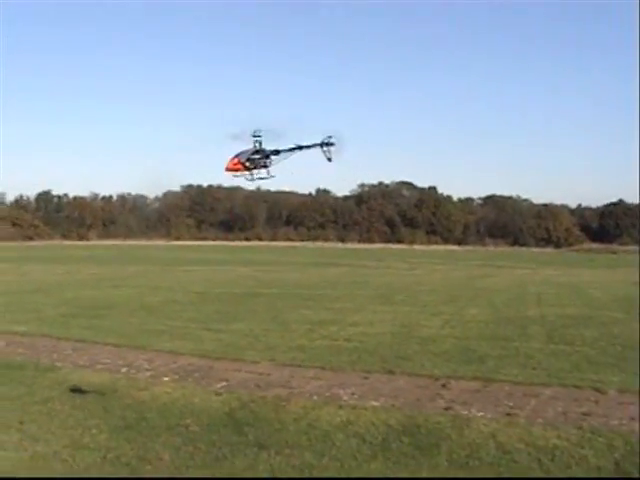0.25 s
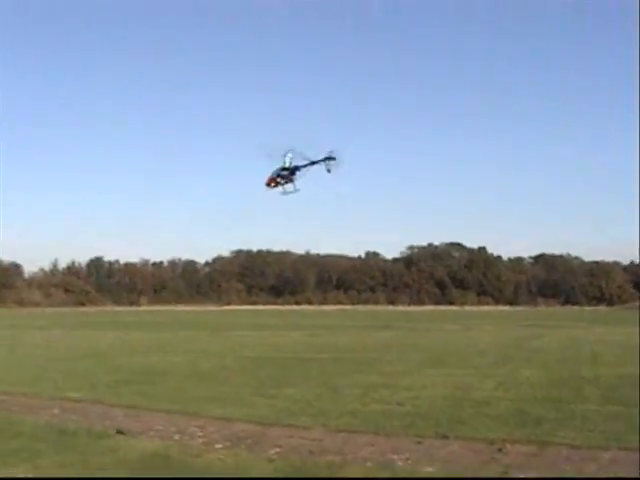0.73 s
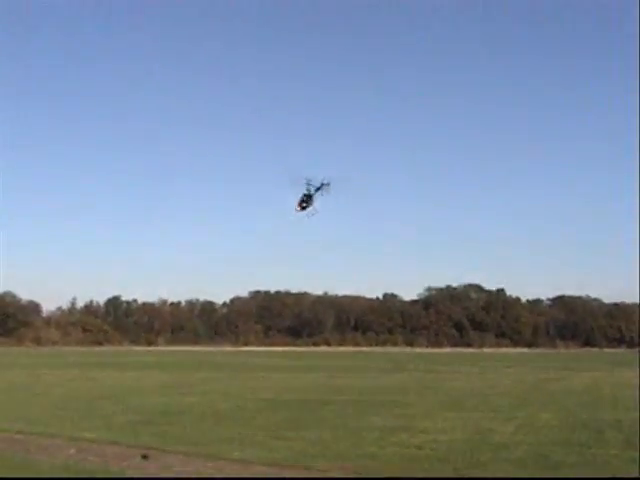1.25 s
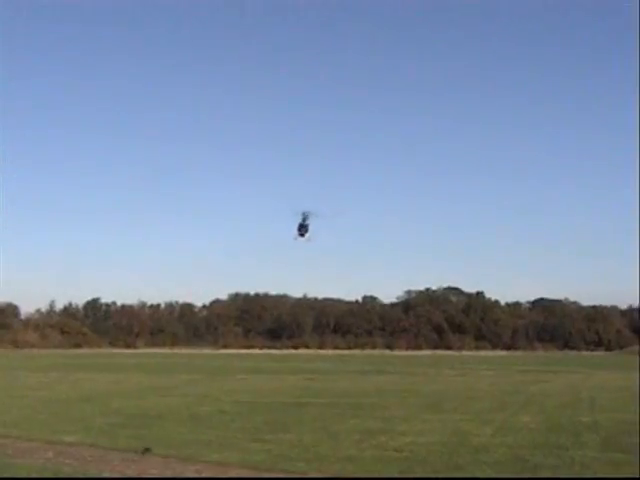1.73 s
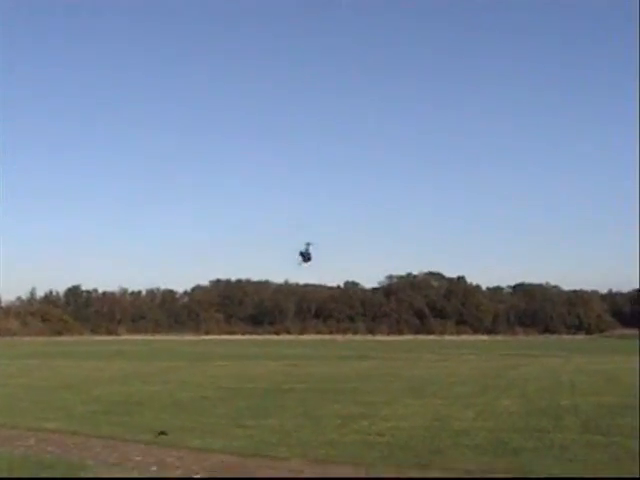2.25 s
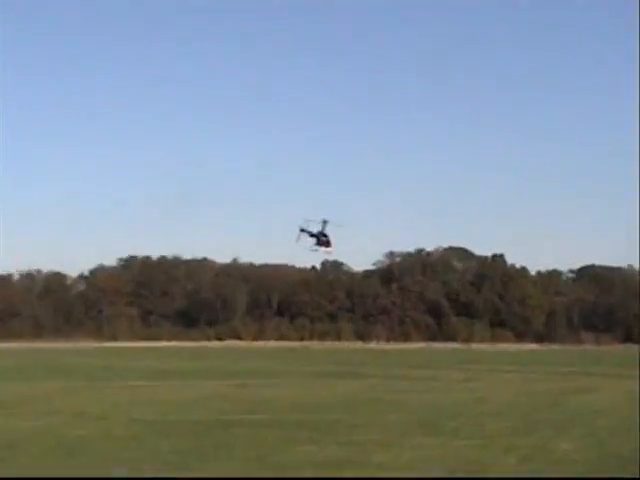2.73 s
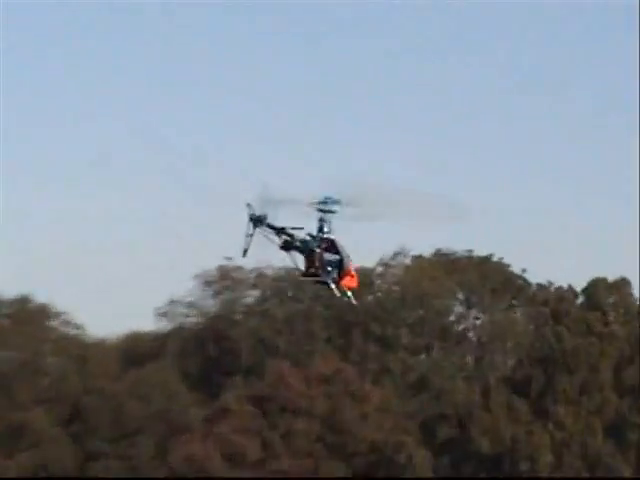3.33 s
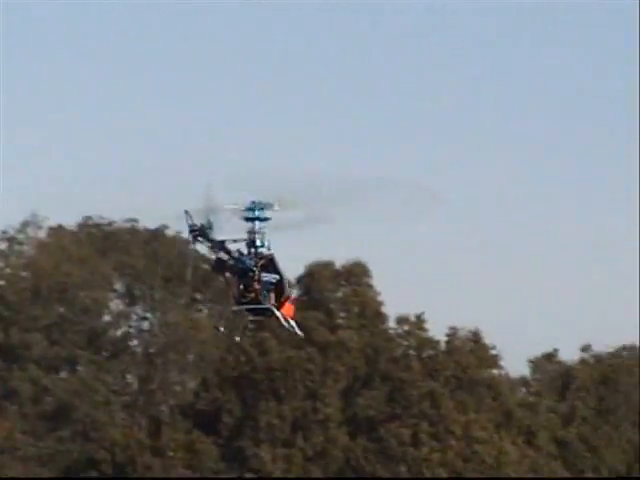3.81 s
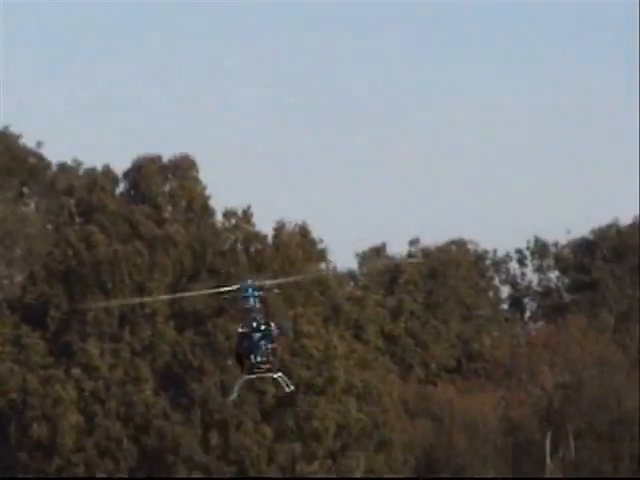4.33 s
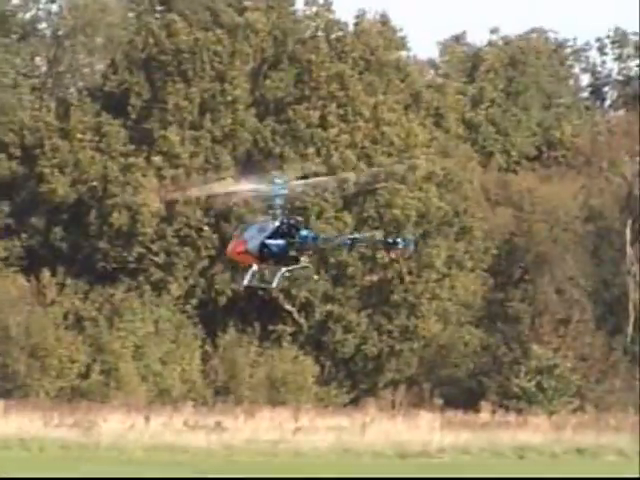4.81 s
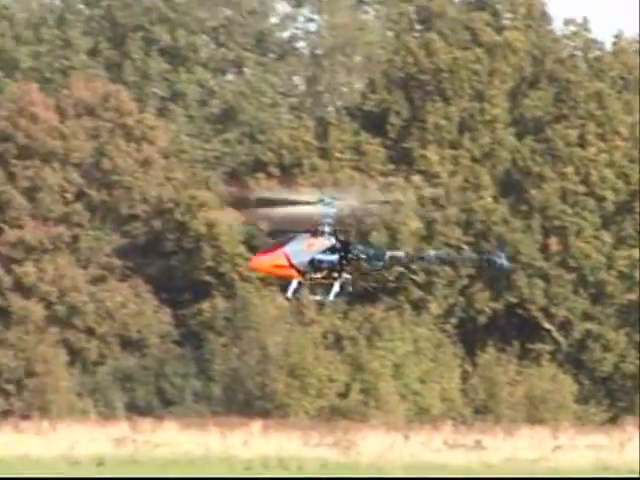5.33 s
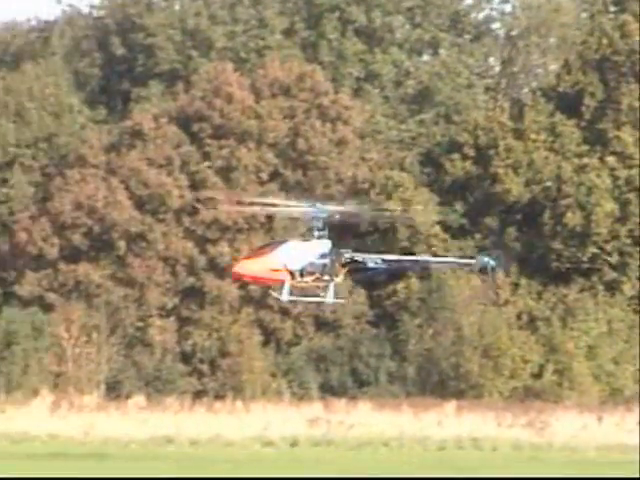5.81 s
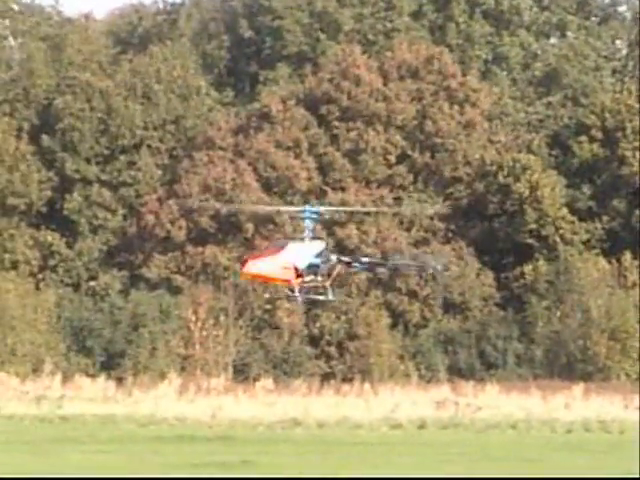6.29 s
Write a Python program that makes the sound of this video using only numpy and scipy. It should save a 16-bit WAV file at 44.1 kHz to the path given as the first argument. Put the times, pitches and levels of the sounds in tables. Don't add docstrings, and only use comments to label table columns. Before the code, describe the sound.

Outdoors, a hobby helicopter's electric motor sings in high, buzzy, metallic tones, with a lower tail rotor hum and a rough hiss of gears and air. The pitch barely wavers while separate tones brighten and fade as the machine swings round. The whine is bold first, flares midway, then eases into a thinner hover. A brief dry knock sounds at the camera, over faint traffic rumble and wind. The stereo sound is slightly muffled at the very top.

```python
import sys
import numpy as np
from scipy import signal
from scipy.fft import rfft, irfft
from scipy.io import wavfile
from scipy.ndimage import uniform_filter1d

SR = 44100
rng = np.random.default_rng(int(sys.argv[2]) if len(sys.argv) > 2 else 0)


def log_audio(samples):
    frames = np.atleast_2d(samples).T
    limited = np.clip(frames, -1, 1)
    pcm = np.round(limited * 32767).astype(np.int16)
    wavfile.write(sys.argv[1], SR, pcm)


def undo_db(level):
    steps = np.asarray(level, float) / 20
    return 10 ** steps


N = 289296
TIME = np.arange(N) / SR
BLOCK = 256
GEAR = 150 / 11

# f/Hz, level/dB
RATTLE_COLOUR = [(1400, -33.5), (1750, -7.5), (2000, -5), (2650, -4), (3250, -3.5), (3700, -1),
                 (4200, -1.5), (4900, -6.5), (6000, -25.5)]
# f/Hz, level/dB
HISS_COLOUR = [(3500, -29), (4900, -1.5), (5400, 4), (5900, 4), (6400, 3), (7000, 0), (7700, 0),
               (8200, -4.5), (8600, -36.5)]


def evened(x):
    return x / np.sqrt(np.mean(x ** 2) + 1e-20)


def read(points, hz):
    f, value = np.transpose(points)
    return np.interp(np.log(hz + 1), np.log(np.abs(f) + 1), value)


def gains(rows):
    s, *columns = np.transpose(rows)
    return [undo_db(np.interp(TIME, s, c)) for c in columns]


def drift(hz, count):
    x = rng.standard_normal((count, N // BLOCK + 2))
    for _ in range(2):
        x = uniform_filter1d(x, max(round(SR / BLOCK / hz), 1))
    return x / x.std(1, keepdims=True)


def full(x):
    return np.interp(np.arange(N) / BLOCK, np.arange(len(x)), x)


def tone(angle):
    return np.cos(angle.astype(np.float32))


def noise(colour, patchy_db):
    # f/Hz, likeness/0..1
    likeness = [(60, 1), (120, 0.98), (240, 0.81), (490, 0.71), (1000, 0.97), (2020, 0.5), (4070, 1),
                (8220, 0.83)]
    # t/s, f/Hz, depth/dB
    high_dip = [(0, 4850, -2.5), (3.5, 4890, -2), (4.5, 4890, 0), (5.1, 4680, -7), (5.6, 4620, -7),
                (5.9, 4540, -0.5), (6.56, 4610, -7.5)]
    # t/s, f/Hz, depth/dB
    low_dip = [(0, 3170, -2.5), (4.4, 2600, -.6), (4.9, 2750, -5.5), (5.5, 3070, -5), (6.0, 3290, -6),
               (6.56, 3350, -6)]
    hz = np.fft.rfftfreq(1024, 1 / SR)
    a, b, c, d, small, broad = rng.standard_normal((N // BLOCK + 5, 513, 6), dtype=np.float32).T
    small = uniform_filter1d(small, size=10, axis=0)
    small = evened(uniform_filter1d(small, size=16, axis=1))
    for _ in range(2):
        broad = uniform_filter1d(broad, size=8, axis=0)
        broad = evened(uniform_filter1d(broad, size=60, axis=1))

    same = np.clip(read(likeness, hz), 0, 1)[:, None]
    left = a + 1j * b
    right = same * left + np.sqrt(1 - same ** 2) * (c + 1j * d)
    z = np.array([left, right])

    t = np.arange(z.shape[2]) * BLOCK / SR - 512 / SR
    dip = 0
    for table, width_hz in ((high_dip, 450), (low_dip, 220)):
        s, dip_hz, dip_db = np.transpose(table)
        distance = (hz[:, None] - np.interp(t, s, dip_hz)) / width_hz
        dip = dip + np.interp(t, s, dip_db) * np.exp(-distance ** 2)
    z *= undo_db(read(colour, hz)[:, None] + dip + patchy_db * (small + broad))
    return evened(signal.istft(z, nperseg=1024, noverlap=768)[1][:, :N])


def rotor_angle():
    # t/s, f/Hz
    motor_speed = [(0, 541.14), (.2, 539.3), (.625, 537.3), (1.125, 536.2), (1.375, 536.25), (1.97, 534.3),
                   (2.25, 536.94), (2.5, 538.6), (3, 539.4), (3.4, 539.35), (4, 536.2), (4.55, 534.4),
                   (4.65, 534.8), (4.98, 539.4), (5.125, 539.94), (5.45, 538.65), (5.9, 539.8),
                   (6.56, 539.8)]
    # t/s, jump/samples
    jumps = [(.782, 3), (.813, 6), (3.84, 2), (3.902, 3)]
    speed = np.interp(TIME, *np.transpose(motor_speed))
    steps = np.ones(N)
    for s, lost in jumps:
        steps[round(s * SR)] += lost
    unevenness = 0.0011 * full(drift(30., count=1)[0])
    return 2 * np.pi * np.cumsum(speed * steps) / SR / GEAR + unevenness


def layer_gains():
    # t/s, nearness/dB, blade load/dB
    flight = [(0, 4.5, 8), (.3, 5, 6.5), (.9, 0.5, 4.5), (1.3, 2, 5), (1.8, 2, -2), (2.1, 1, 3.5),
              (2.6, 0.5, -2), (3.0, -0.5, 2), (3.9, -0.5, -2), (4.2, -2.5, -1), (4.5, -2.5, -3),
              (5.1, -2.5, -2.5), (5.65, -1, -1.5), (6.0, -4, 0.5), (6.56, -7.5, 0)]
    # level/dB, share of nearness/1, share of blade load/1
    layers = [
        (-43, 0.093, .2),
        (-49.5, .1, 1),
        (-35, 0.42, 0.2),
        (-35.5, 1, .05),
    ]
    near, load = gains(flight)
    return [undo_db(db) * near ** a * load ** b for db, a, b in layers]


def beamed(beams):
    s, db, width = np.transpose(beams)[:, :, None]
    t = np.arange(N // BLOCK + 2) * BLOCK / SR
    edge_db = -6
    each = undo_db(db + edge_db * ((t - s) / width) ** 2)
    return full(np.sqrt((each ** 2).sum(0)))


def strong_tones(angle):
    # t/s, peak level/dB, half width/s
    tail_beams = [
        [(.25, -46, 0.61), (1.1, -42.5, 0.43), (2.2, -43.5, 0.22), (2.65, -38, 0.41), (3.6, -38.5, 0.71),
         (4.35, -43, 0.26), (5.9, -55, 0.97)],
        [(0.57, -38.5, 0.34), (1.38, -50, 0.51), (3.05, -47, 0.89), (5.11, -40.5, 0.3), (6.06, -48.5, 0.21)],
    ]
    # t/s, peak level/dB, half width/s
    motor_beams = [
        [(0.67, -40.5, 0.79), (2.19, -41, 0.18), (2.64, -36.5, 0.21), (3.24, -43.5, 1.38), (3.48, -38.1, 0.37),
         (4.85, -45, 0.29), (6.03, -39, 0.36)],
        [(0.0, -36, 1.04), (0.4, -33.5, 0.061), (2.92, -39.5, 0.13), (3.2, -40, 0.89), (4.24, -41, 0.11),
         (5.79, -36, 0.52)],
        [(0.01, -28, 0.59), (1.58, -35.5, 0.091), (1.86, -35, 0.05), (2.25, -28, 0.22), (2.52, -26, 0.077),
         (2.87, -27.5, 0.11), (3.15, -31, 1.25), (3.91, -33, 0.11), (4.82, -35.5, 0.1), (5.73, -32, 0.18),
         (6.29, -35.5, 0.23)],
        [(0.11, -37.5, 0.19), (1.58, -42, 0.66), (2.58, -36.5, 0.059), (4.13, -53.5, 1.5), (4.4, -43, 0.24),
         (5.72, -42.5, 0.1)],
    ]
    # t/s, peak level/dB, half width/s
    mesh_beams = [
        [(0.5, -30.5, 1.4), (2.58, -38, 0.22), (2.98, -32, 0.068), (3.29, -29, 0.11), (3.63, -33, 0.16),
         (3.95, -34.5, 0.08), (4.33, -39.5, 0.26), (4.95, -37, 0.23), (6.12, -38.5, 0.49)],
        [(0.25, -25, 0.046), (0.59, -30.5, 1.36), (0.67, -27.5, 0.37), (2.48, -33.5, 0.38), (3.07, -34, 0.075),
         (3.54, -41.5, 0.34), (3.79, -38, 0.08), (4.88, -29.5, 0.33), (5.74, -32.5, 0.24), (6.44, -35, 0.32)],
        [(0.82, -29.5, 0.34), (2.06, -32.5, 1.4), (2.24, -39.5, 0.09), (2.47, -34.5, 0.06), (3.78, -38, 0.31),
         (4.53, -38.4, 0.29), (5.19, -39, 0.82), (5.71, -41.5, 0.24)],
    ]
    # t/s, peak level/dB, half width/s
    spoke_beams = [
        [(0.32, -43.9, 1.43), (2.78, -46, 0.61), (4.85, -48, 0.39), (6.04, -47, 0.58)],
        [(0.5, -38, 0.83), (2.34, -46.5, 0.14), (3.06, -43, 0.23), (3.23, -49, 1.4), (6.22, -47.5, 1.7)],
        [(0.0, -37, 1.05), (3.0, -44, 0.15), (3.14, -52.5, 1.4), (5.6, -46, 0.85)],
        [(0.0, -37.6, 0.49), (1.54, -42.5, 1.9), (2.52, -39.2, 0.47), (3.58, -47, 1.5), (4.76, -43.4, 0.14),
         (5.81, -43.7, 0.31)],
    ]
    tail = 8.485
    orders = np.array([tail, 2 * tail, 4 * GEAR, 5 * GEAR, 7 * GEAR, 8 * GEAR, 145, 150, 155,
                       GEAR + 5, 4 * GEAR - 5, 4 * GEAR + 5, 7 * GEAR - 5])
    depth = np.array([.1, .2, .5, .4, 1.3, .5, 1, 1, 1, .2, .4, .5, .8])
    levels = map(beamed, tail_beams + motor_beams + mesh_beams + spoke_beams)
    flutter = drift(16.0, count=len(orders))
    start = rng.uniform(0, 2 * np.pi, len(orders))
    start[7] = (start[6] + start[8]) / 2

    runout = .25 * np.sin(angle) + .2 * np.sin(2 * angle + 1)
    shading = 0.19 * np.cos(angle + 2.9) + 0.1 * np.cos(2 * angle)
    out = np.zeros(N)
    for order, level, f, p, d in zip(orders, levels, flutter, start, depth):
        waver = 1 + d * (.13 * full(f) + shading)
        out += np.sqrt(2) * level * waver * tone((order * angle + p + d * runout) % (2 * np.pi))
    return out


def faint_tones(angle):
    # motor order/1, own level/dB, level 5 rotor orders away/dB, level 10 rotor orders away/dB
    motor_tones = [(1, -47, -99, -99), (2, -54, -99, -99), (3, -61, -59, -99), (5, -99, -55, -58),
                   (6, -52, -54.5, -99), (7, -99, -99, -59), (8, -99, -54.5, -57), (9, -58.4, -57, -99),
                   (10, -47, -55.7, -60), (11, -99, -99, -47), (12, -48, -53, -58), (13, -58.3, -99, -99),
                   (14, -99, -62, -99)]
    # rotor order/1, mean level/dB
    other_tones = [(2, -51.9), (2.53, -57), (4, -58), (10, -63), (17.94, -53), (19, -56.8), (21, -56.6),
                   (29.7, -61), (33.94, -61), (42.4, -63), (46.64, -50), (50.91, -56), (89.45, -53),
                   (91.45, -54), (91.82, -55), (92.45, -56), (87.82, -57.4), (96, -54.2), (100.45, -51.2),
                   (101, -51.9), (105.45, -51), (106, -54.6), (111, -58.7), (135, -54.3), (137, -59),
                   (138, -56.3), (139, -57), (159, -56.2), (161, -57.7), (165, -57), (199.55, -58)]
    tones = []
    for k, own, near, far in motor_tones:
        for away, db in ((0, own), (-5, near), (5, near), (-10, far), (10, far)):
            if db > -90:
                tones.append((k * GEAR + away, db))
    tones = tones + other_tones
    fade_db = 3.0 * np.clip(drift(2.0, count=len(tones)), -3, 1.5)
    start = rng.uniform(0, 2 * np.pi, len(tones))
    out = np.zeros(N)
    for (order, db), fade, p in zip(tones, fade_db, start):
        out += full(undo_db(db + min(order / 40, 1) * fade)) * tone(order * angle + p)
    return undo_db(2.5) * out * evened(layer_gains()[2])


def teeth(angle):
    size = 8192
    hz = np.arange(size // 2 + 1) * 39.4
    place = angle / (2 * np.pi) % 1 * size
    out = np.zeros(N)
    for colour, level in zip((RATTLE_COLOUR, HISS_COLOUR), layer_gains()[2:]):
        for wear in drift(2.2, count=2):
            pattern = irfft(rfft(rng.standard_normal(size)) * undo_db(read(colour, hz)))
            out += level * full(wear) * np.interp(place, np.arange(size), evened(pattern), period=size)
    return undo_db(-13.5) * out


def rush(angle):
    # f/Hz, level/dB
    wash_colour = [(150, -7.5), (300, -4.5), (450, -7), (750, -0.5), (1050, -2), (1300, -21), (2000, -33.5)]
    # f/Hz, level/dB
    swish_colour = [(700, -31.5), (1100, -2), (1300, 1), (1650, -2), (1900, -4.5), (2600, -32)]
    wash, swish, rattle, hiss = layer_gains()
    turn, blades, spokes = np.cos(angle), np.cos(2 * angle), np.cos(5 * angle)
    out = undo_db(1.56) * wash * (1 + 0.068 * turn + 0.11 * blades) * noise(wash_colour, patchy_db=1.0)
    out += undo_db(1.9) * swish * (1 + 0.061 * turn + .1 * blades) * noise(swish_colour, patchy_db=0.9)
    out += undo_db(-0.43) * rattle * (1 + 0.13 * turn + 0.03 * spokes) * noise(RATTLE_COLOUR, patchy_db=2.04)
    out += undo_db(0.25) * hiss * (1 + 0.11 * turn + 0.077 * spokes) * noise(HISS_COLOUR, patchy_db=0.9)
    return out


def knock():
    # t/s, level/dB
    taps = [
        (3.661, -15),
    ]
    # f/Hz, level/dB, time to fall 60 dB/s, rise time/s
    case_tones = [(838, -6.5, 0.051, 0.0087), (1210, -3, .015, 0.0023), (1370, -4, 0.018, 0.0017),
                  (1830, -4.5, 0.013, 0.0024), (2140, -6, 0.011, 0.0011)]
    out, t = np.zeros(N), np.arange(3000) / SR
    ring = np.zeros(len(t))
    for hz, db, t60, rise in case_tones:
        ring += undo_db(db - 60 * t / t60) * np.minimum(t / rise, 1) ** 2 * np.sin(2 * np.pi * hz * t)
    for s, db in taps:
        out[round(s * SR):][:len(ring)] += undo_db(db + 2.0) * ring
    return out


def rumble():
    # t/s, level/dB
    loudness = [(0.0, -48.5), (0.13, -51), (4.82, -42), (4.97, -45.5), (5.86, -43), (6.56, -42.5)]
    # f/Hz, level/dB
    traffic_colour = [(20, -42), (35, -24), (55, -6), (80, 5.5), (120, -5), (200, 0), (300, -19),
                      (600, -29.5)]
    # f/Hz, level/dB
    wind_colour = [(15, -20), (28, -3), (45, 0), (60, -8), (90, -35)]
    wind = irfft(rfft(rng.standard_normal(N)) * undo_db(read(wind_colour, np.fft.rfftfreq(N, 1 / SR))), N)
    traffic = undo_db(0.5) * noise(traffic_colour, patchy_db=0.5)
    return gains(loudness)[0] * (traffic + undo_db(-11) * evened(wind) * [[1], [-1]])


def scene():
    angle = rotor_angle()
    machine = strong_tones(angle) + faint_tones(angle) + teeth(angle)
    return machine + knock() + rush(angle) + rumble()


def roll_off(x):
    return signal.sosfilt(signal.butter(12, 8820, fs=SR, output="sos"), x)


def record(dry):
    # f/Hz, level/dB
    balance = [(60, 0), (100, 0), (180, 0.5), (310, 0.5), (530, -3.5), (920, -1.5), (1590, -6),
               (2750, -5.5), (4760, -1), (8220, 4)]
    # f/Hz, phase/radians
    lead = [(0, 0), (340, -0.29), (950, 0.64), (1460, -0.74), (1720, 0.33), (2150, 0.73), (3450, 0.68),
            (4310, 0.87), (4910, 0.62), (7410, 0.3), (8350, -0.1)]
    hz = np.fft.rfftfreq(N, 1 / SR)
    half = undo_db(read(balance, hz) / 2) * np.exp(.5j * read(lead, hz))
    edge = undo_db(read([(20, -13), (45, -0.5), (7600, 0.5), (8000, -4.0), (8150, -12.5), (8230, -66)], hz))
    ports = np.array([half, 1 / half])
    ports = ports / np.abs(ports.mean(0)) * edge
    mix = irfft(rfft(dry) * ports, N)
    return roll_off(mix)


dry = scene()
out = record(dry)
log_audio(out)
```